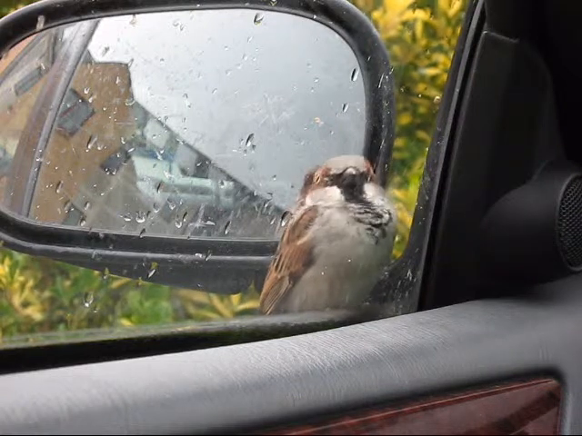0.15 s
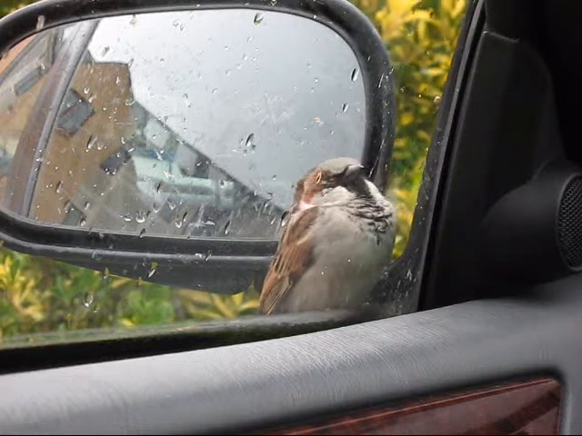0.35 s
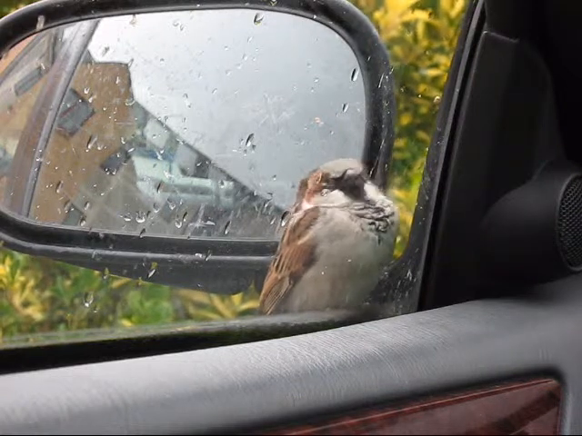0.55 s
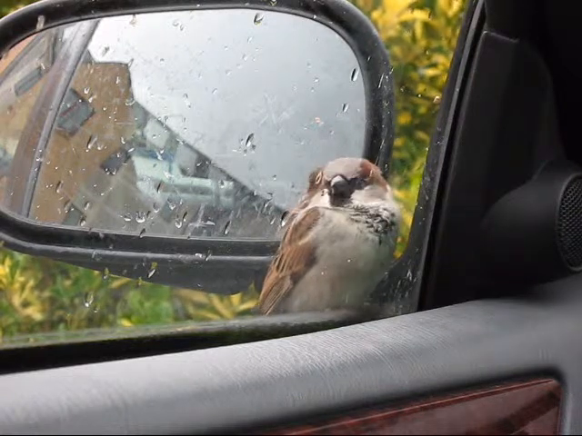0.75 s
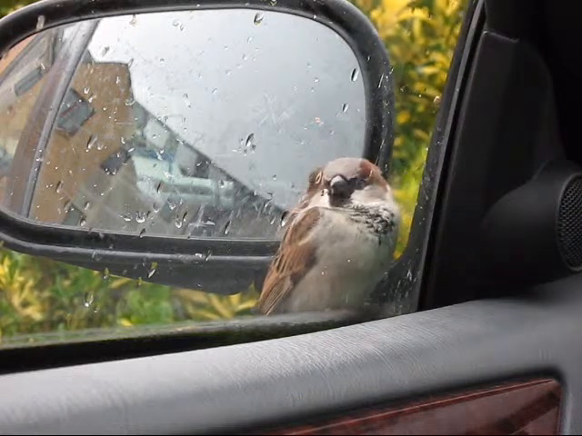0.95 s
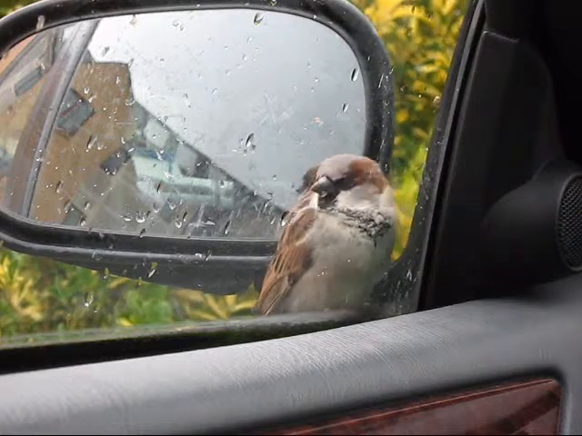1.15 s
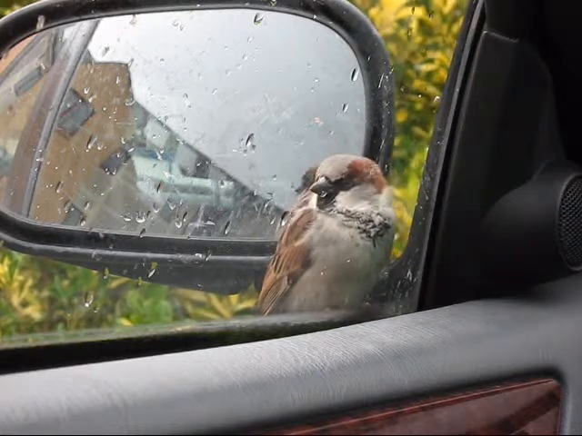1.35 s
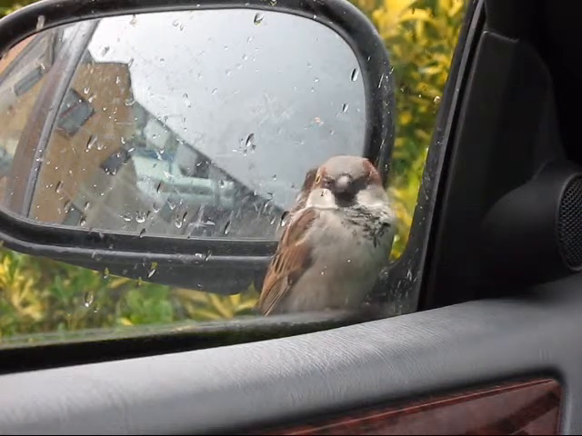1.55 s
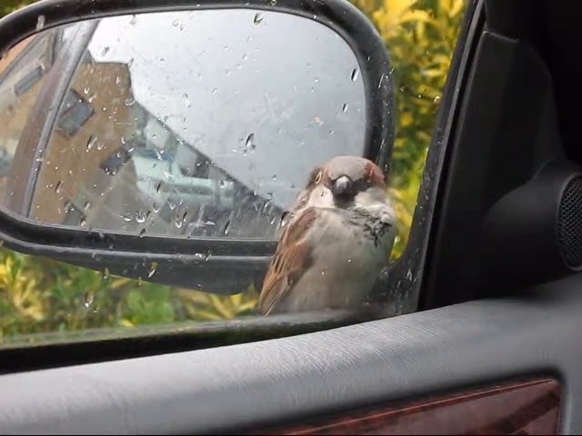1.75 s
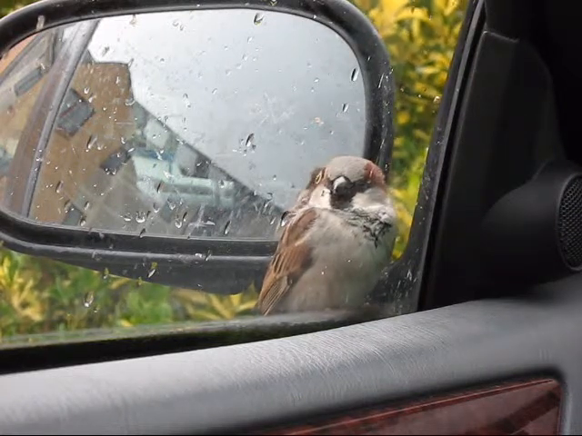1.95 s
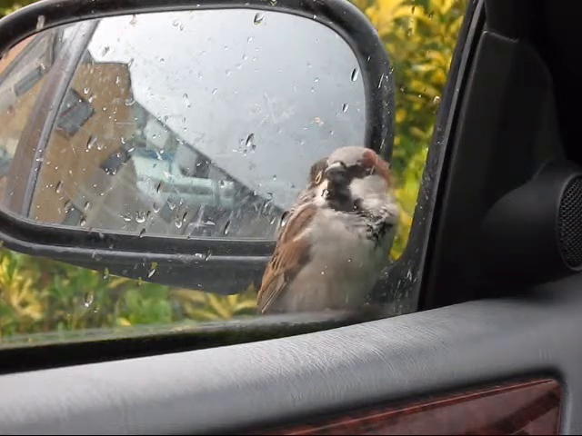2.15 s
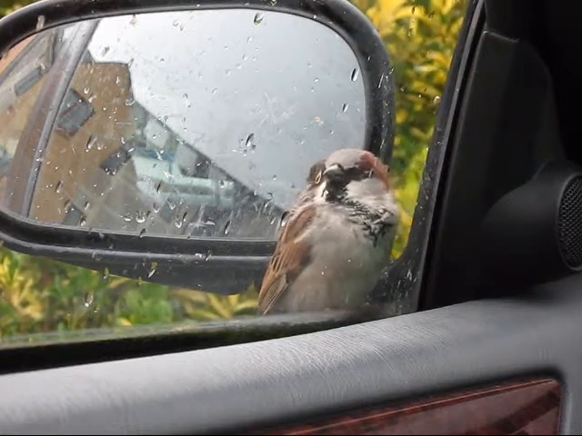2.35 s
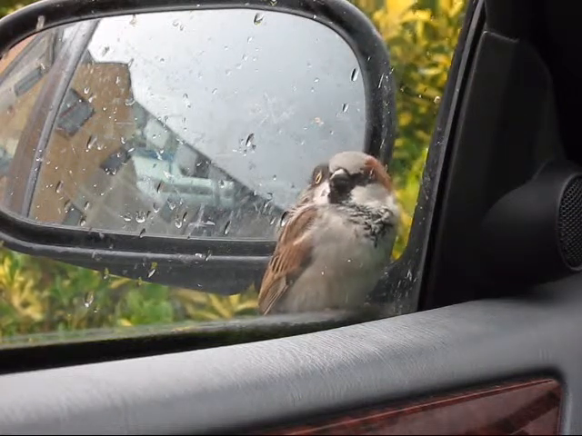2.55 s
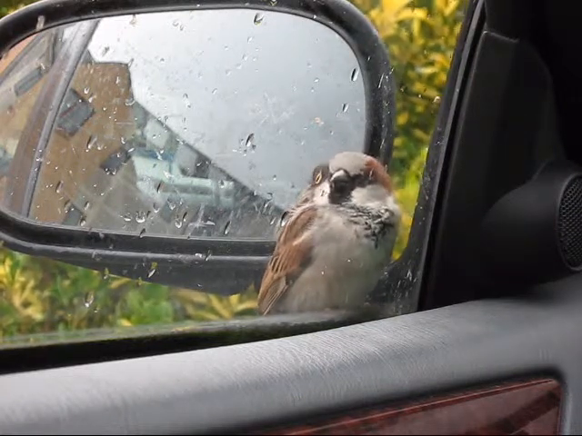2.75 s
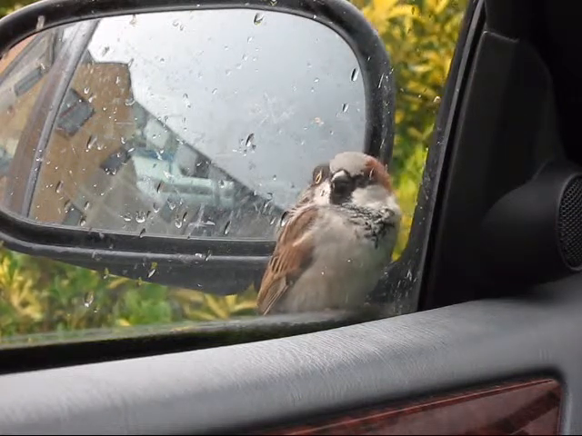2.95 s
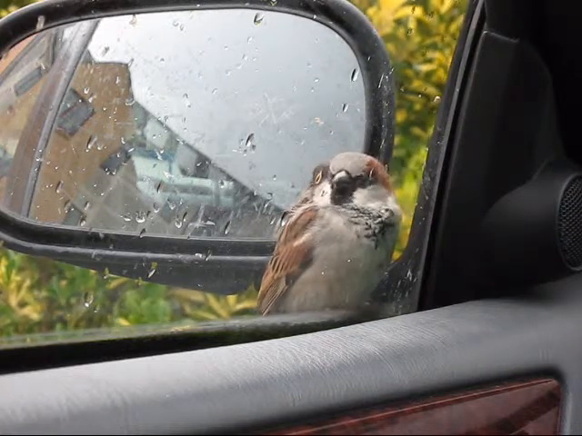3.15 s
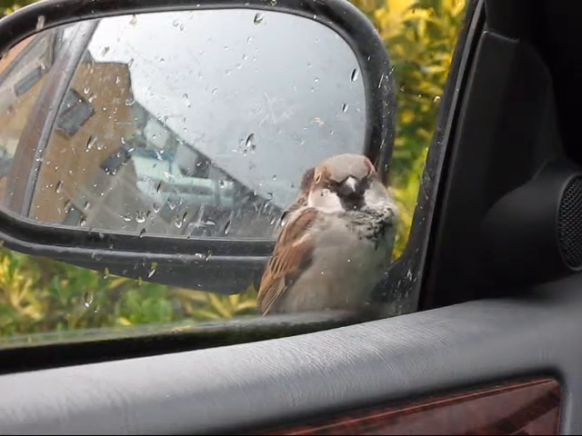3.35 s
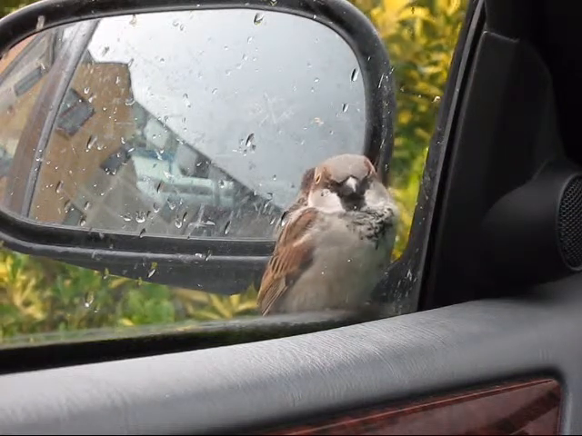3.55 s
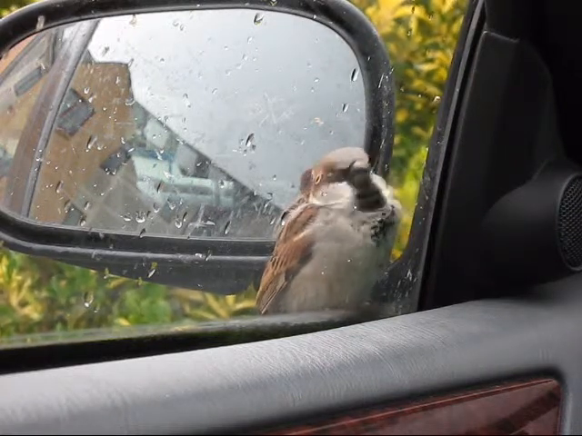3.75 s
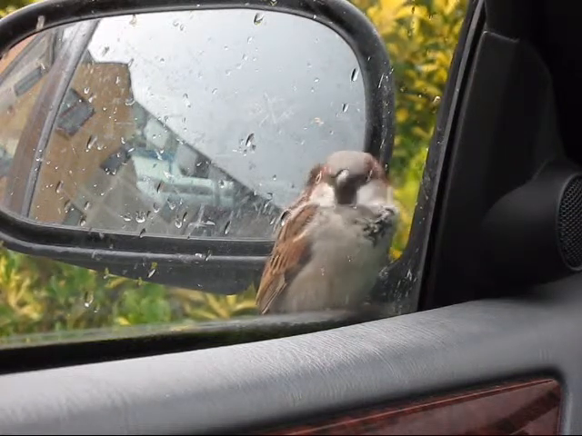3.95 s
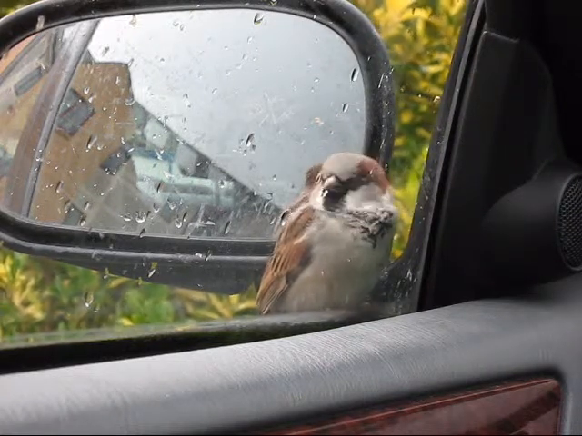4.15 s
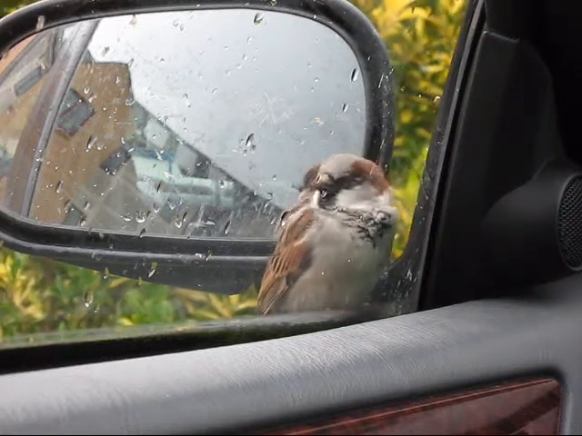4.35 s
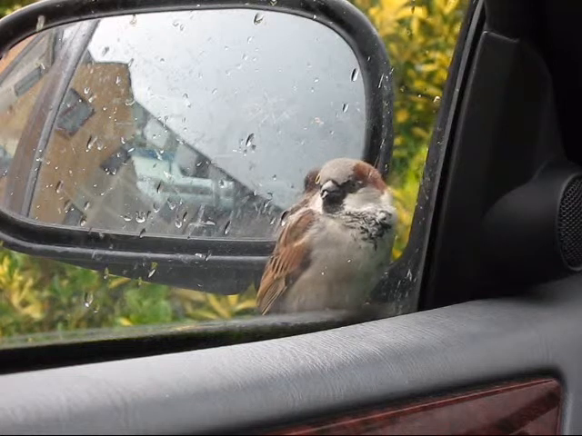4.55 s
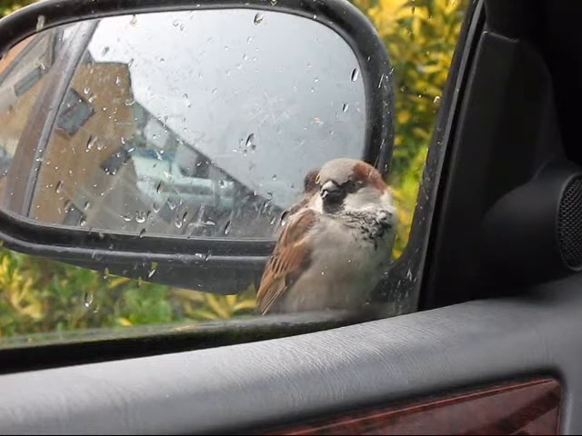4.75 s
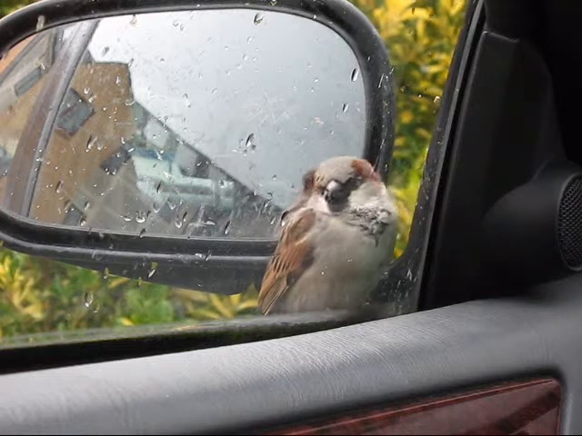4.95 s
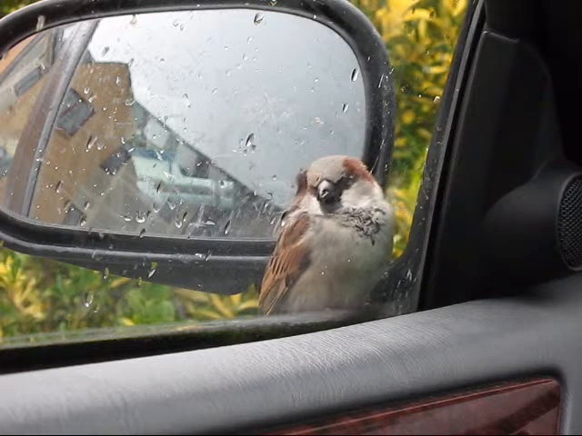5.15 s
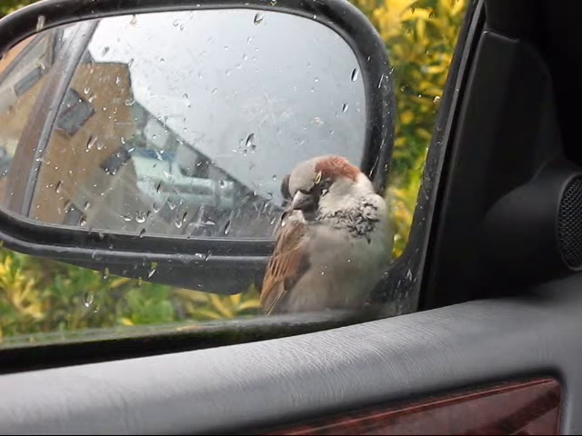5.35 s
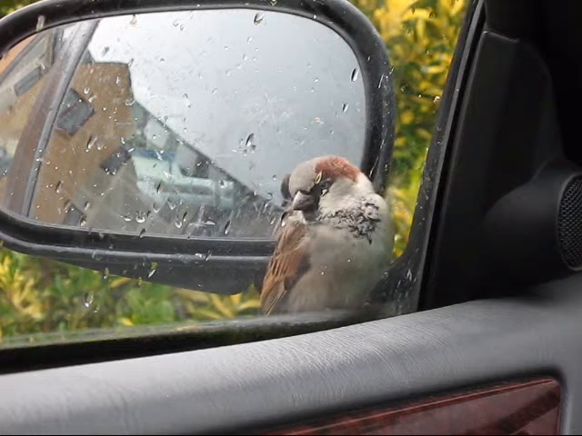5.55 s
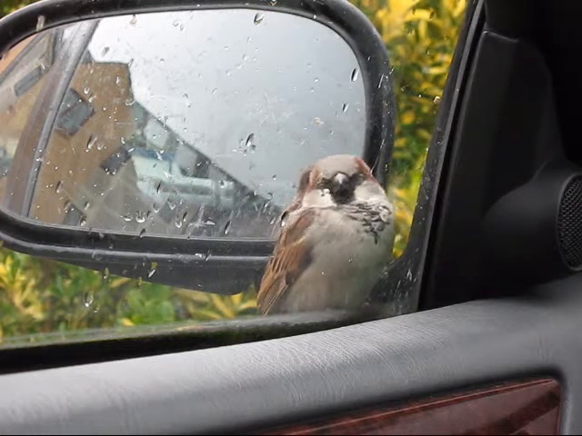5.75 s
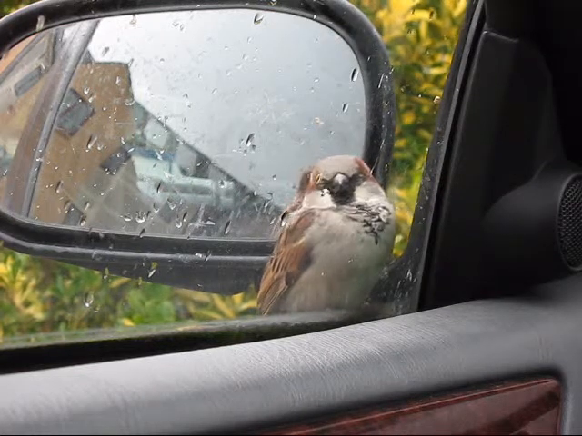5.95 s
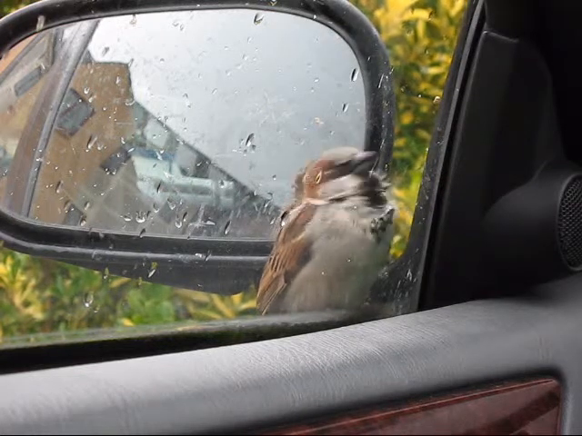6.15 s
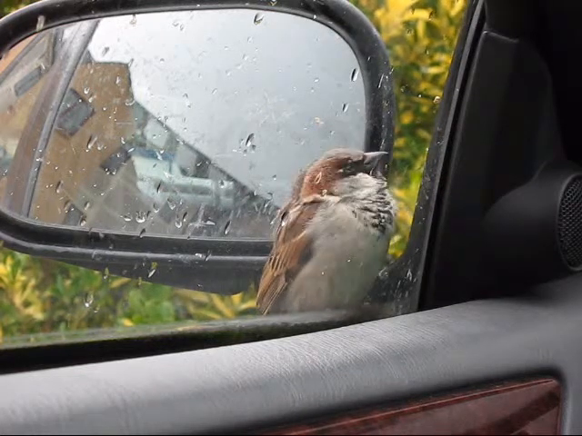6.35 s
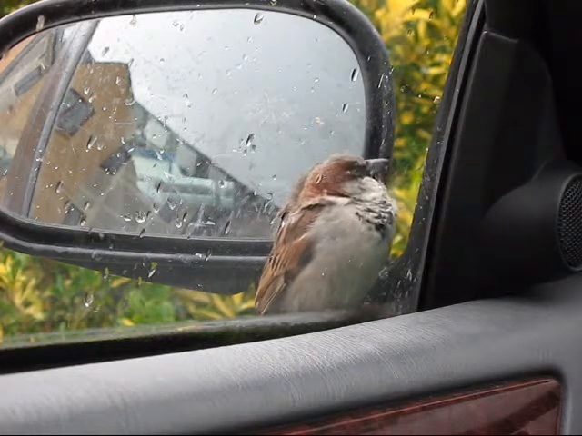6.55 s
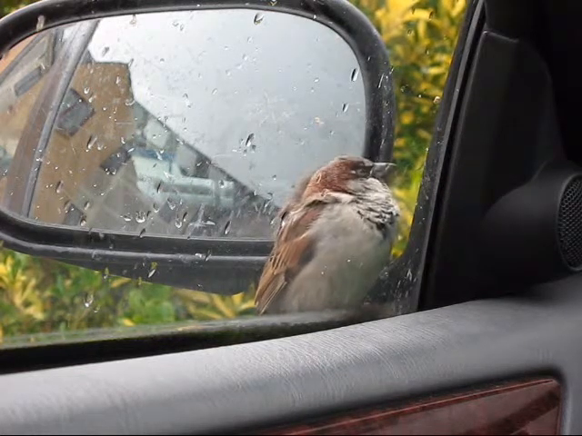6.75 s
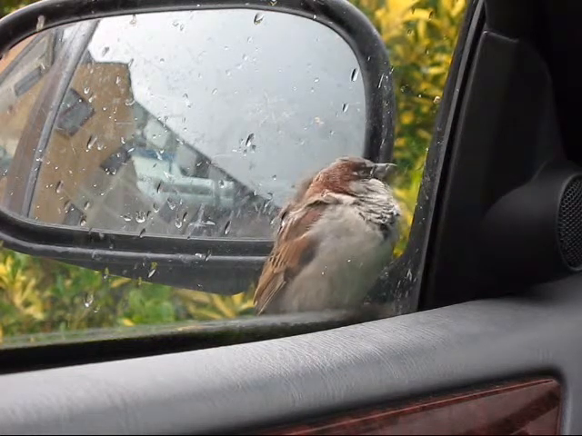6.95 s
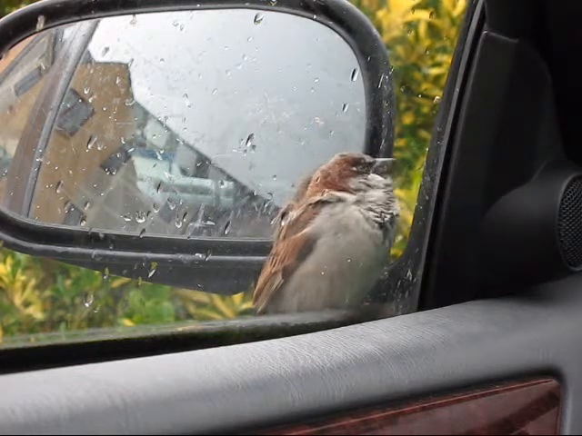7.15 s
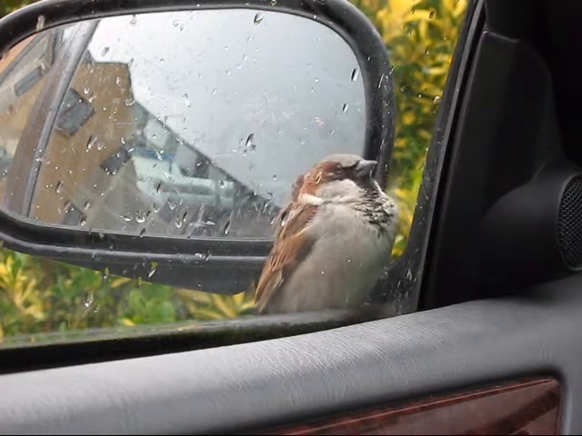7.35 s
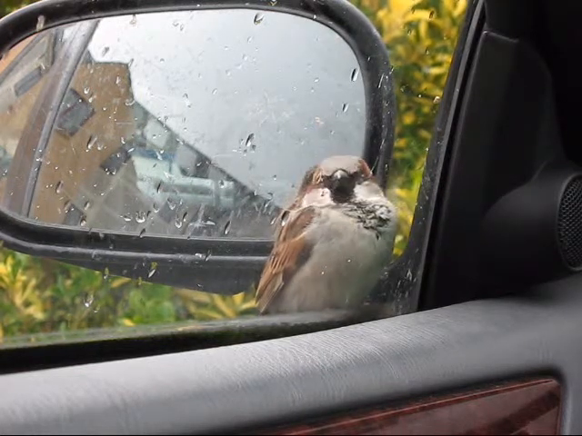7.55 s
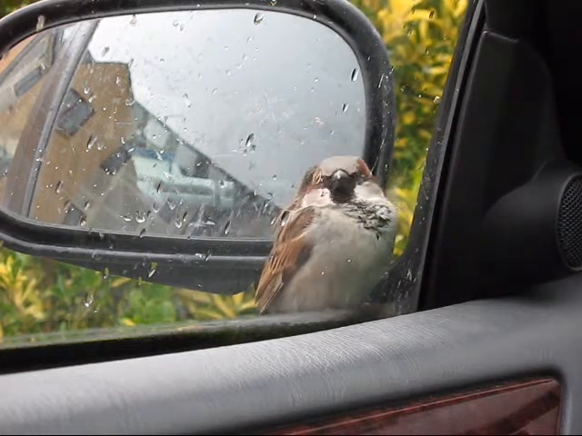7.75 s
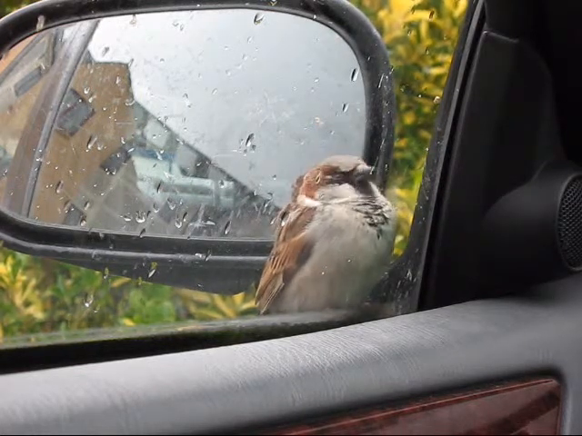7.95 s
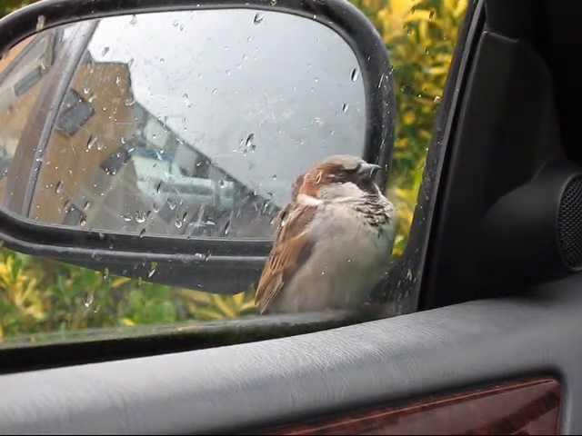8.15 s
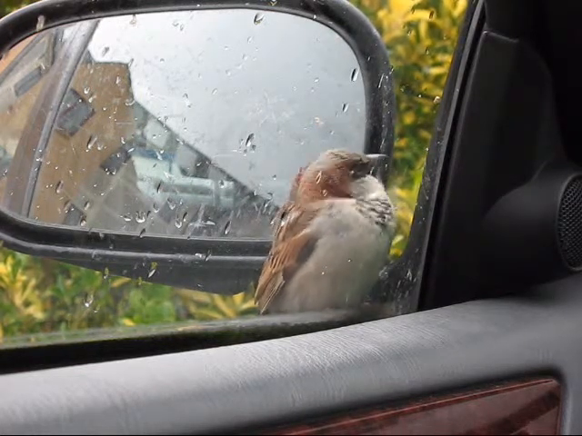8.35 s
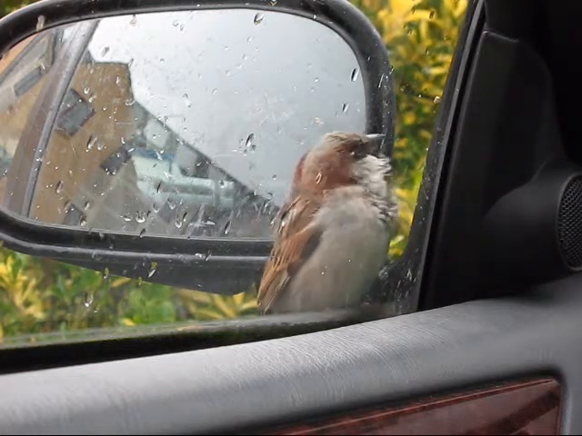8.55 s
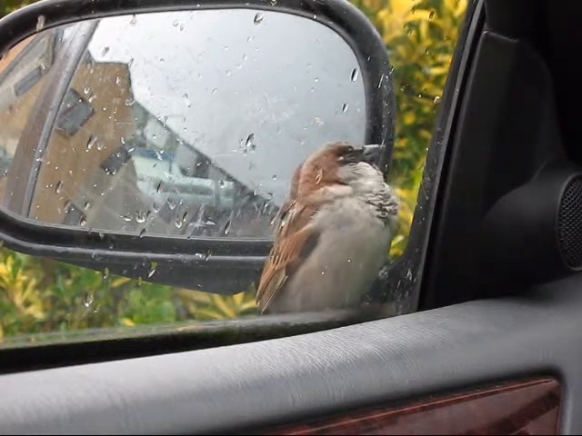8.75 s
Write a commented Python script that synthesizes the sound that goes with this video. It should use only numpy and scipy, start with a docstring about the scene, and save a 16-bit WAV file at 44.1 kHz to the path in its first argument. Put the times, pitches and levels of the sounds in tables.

```python
"""The end of a sparrow's falling whistle opens the scene, heard by a small camera inside a car.
Two soft knocks on the car body follow, then the bird, on the sill of an open window, chirps five times.
Each chirp is a rising whistle, a quick upward flick and a falling, burred whistle; moving sine pitches
and filtered hiss make them, and the cabin echoes them briefly. Throughout, the camera's drive hums and whines
over distant rumble and faint tones; its coarse converter adds hiss and mirrored treble."""
import sys
import numpy as np
from scipy import signal
from scipy.fft import rfft, irfft
from scipy.io import wavfile
from scipy.ndimage import uniform_filter1d

SR = 44100
rng = np.random.default_rng(int(sys.argv[2]) if len(sys.argv) > 2 else 0)


def transcribe(signal):
    """Save signal, clipped to [-1, 1], as a 16-bit WAV file at the path in sys.argv[1]."""
    frames = np.atleast_2d(signal).T
    limited = np.clip(frames, -1, 1)
    pcm = np.round(limited * 32767).astype(np.int16)
    wavfile.write(sys.argv[1], SR, pcm)


N = 387198  # samples in the scene
TIME = np.arange(N) / SR  # seconds

# Both whistles: how they start and stop
ATTACK_S, ATTACK_DB, ATTACK_HZ = .0035, 14, 109.75  # the start is this much softer and lower
RELEASE_S, RELEASE_DB, RELEASE_HZ = .006, 17.5, 169.5  # time and pitch drop: falling whistle only
# Rising whistle: its scoop, then the leap to the held top
SCOOP_FROM_HZ, SCOOP_SWELL_DB, SCOOP_SAG_HZ = 2150, 15.5, 39.97
LEAP_HZ, LEAP_DB, SETTLE_S, CUT_S = 3440, -31, .008, .004
# Falling whistle: its burr (throbbing) and the break in pitch
BURR_HZ, BURR_FROM_HZ, BURR_SWING_HZ = 166, 3650, 122.9
CLEAR_BURR, FULL_BURR = .07, .62  # depths, 0 to 1
TURN_S, TURN_DROP_HZ, TURN_FADE_DB = .007, 481, 3.5


def undb(db):
    """Turn decibels into a plain multiplier."""
    return 10 ** (np.asarray(db) / 20)


def walk(rate):
    """Random wandering: levels held 1 / rate seconds, then smoothed twice; spread near 1."""
    hold = int(SR / rate)
    steps = np.repeat(rng.standard_normal(N // hold + 1), hold)
    return 1.3 * uniform_filter1d(uniform_filter1d(steps, hold), hold)[:N]


def phase_of(hz):
    """Add up a moving pitch to get the phase in radians."""
    return 2 * np.pi * np.cumsum(hz) / SR


def rumble():
    """Dull noise from far off, swelling a little, over the microphone's own hiss."""
    # Noise strength at each pitch: (frequency [Hz], level [dB per Hz])
    noise_colour = [(15, -87), (40, -71), (52, -71.5), (62, -79), (95, -75), (135, -72), (200, -73),
                    (270, -79), (400, -79.5), (900, -86), (2000, -91.5), (5500, -96)]
    hz, db = np.transpose(noise_colour)
    freqs = np.maximum(np.fft.rfftfreq(N, 1 / SR), 1)
    colour = undb(np.interp(np.log(freqs), np.log(hz), db)) * np.sqrt(SR / 2)
    noise = irfft(rfft(rng.standard_normal(N)) * colour, N)
    return noise * undb(.7 * walk(.8))


def drones():
    """Faint sine tones in the rumble, wandering in pitch and level."""
    # Middle of each wandering tone: (frequency [Hz], level [dB])
    drone_tones = [(129, -62), (148, -65.5), (205, -63), (392, -70.5)]
    out = np.zeros(N)
    for hz, db in drone_tones:
        level = np.sqrt(2) * undb(db + 3.5 * walk(4))
        out += level * np.sin(phase_of(hz * (1 + .03 * walk(5))))
    return out


def thuds():
    """Soft knocks on the car body: low panel tones that ring and die away."""
    # Ringing tones: (time [s], frequency [Hz], level before fade-in [dB], time to fade 60 dB [s])
    panel_tones = [(1.462, 35.97, -31.5, 0.46), (1.466, 80.8, -38.5, 0.25), (1.50, 140.6, -40, .2),
                   (1.775, 61.5, -42.5, 0.088)]
    out = np.zeros(N)
    for start, hz, db, t60 in panel_tones:
        t = np.maximum(TIME - start, 0)
        fade_in = np.minimum(t / .008, 1)
        out -= undb(db - 60 * t / t60) * fade_in * np.sin(2 * np.pi * hz * t)
    return out


def drive():
    """The camera's drive: a wavering hum and a whine whose pitch trembles once a shaft turn."""
    hum_hz, hum_db = 73.7, -48.5
    whine_hz, whine_db = 3044.5, -56
    wobble_hz, wobble_rad = 19.75, .5
    hum = undb(hum_db + 2.2 * walk(12)) * np.sin(phase_of(hum_hz + .7 * walk(3)))
    wobble = wobble_rad * np.sin(2 * np.pi * wobble_hz * TIME)
    whine = undb(whine_db + .5 * walk(5)) * np.sin(2 * np.pi * whine_hz * TIME + wobble)
    return np.sqrt(2) * (hum + whine)


def cabin(x):
    """Sound bouncing in the car: a few clear echoes off glass and roof, then a short blurred tail."""
    # Early echoes, beside a direct sound of 0 dB: (delay [s], level [dB])
    early_echoes = [(.0023, -11), (.0041, -12), (.0067, -14)]
    t60_s, tail_db = .11, -13.5
    t = np.arange(SR // 4) / SR
    tail = rng.standard_normal(len(t)) * undb(-60 * t / t60_s) * np.minimum(t / .006, 1)
    response = tail * undb(tail_db) / np.sqrt(np.sum(tail ** 2))
    response[0] = 1  # the direct sound
    for delay, db in early_echoes:
        response[int(delay * SR)] += undb(db)
    response /= np.sqrt(np.sum(response ** 2))  # keep the overall loudness
    return signal.oaconvolve(x, response)[:N]


def air(low_hz, high_hz):
    """Hiss of air escaping through the beak: noise kept between two frequencies."""
    band = signal.butter(3, [low_hz, high_hz], "band", fs=SR, output="sos")
    return signal.sosfilt(band, rng.standard_normal(N))


def flicks():
    """A rough leap up to a top pitch and a slower drop back, all in about a hundredth of a second."""
    # (time of the top [s], top frequency [Hz], sine's peak level [dB], time scale [s])
    # the leap up takes 1/2 of the time scale, the drop back 1/1.3
    flick_tops = [(2.203, 4860, -25, 0.0099), (3.84, 4740, -26.5, 0.0096), (6.201, 4940, -23.5, .011),
                  (7.104, 4820, -26.5, 0.011), (8.531, 5244, -28, .011)]
    out, grain, puff = np.zeros(N), walk(900), air(3600, 5400)
    for top, top_hz, db, scale in flick_tops:
        u = (TIME - top) / scale * np.where(TIME < top, 2, 1.3)  # -1 start, 0 top, 1 end
        on = abs(u) < 1
        hz = top_hz * (1 - .25 * u[on] ** 2 + .027 * grain[on])
        swell = undb(db) * np.cos(np.pi * u[on] / 2) ** .7
        out[on] = swell * (np.sin(phase_of(hz)) + 1.1 * puff[on])
    return out


def spell(notes):
    """Join each note's corner points (s, Hz, dB, ..) into moving pitch, gain and any further columns."""
    # Brief dips in level: (deepest time [s], depth [dB], recovery [s], pitch kick [Hz])
    level_dips = [(2.184, 13, 0.0043, 142), (3.816, 16, .004, 150.5), (3.872, 8.5, 0.0029, 50),
                  (6.182, 7, .003, 49.5), (6.192, 15, .003, -120), (6.236, 12, 0.0032, 80.5),
                  (7.080, 8, .003, 50.5), (7.089, 14, 0.0027, 80.5), (7.099, 17, .004, 170.5),
                  (8.545, 10, .002, 50), (8.506, 9, .003, 50)]
    on = sum((TIME >= note[0][0]) & (TIME <= note[-1][0]) for note in notes)
    times, *columns = np.transpose(np.concatenate(notes))
    hz, db, *rest = (np.interp(TIME, times, column) for column in columns)
    for at, depth_db, recovery, kick_hz in level_dips:
        dip = np.interp(TIME, [at - .003, at, at + recovery], [0, 1, 0])
        hz = hz + kick_hz * dip
        db = db - depth_db * dip
    gain = np.sqrt(2) * uniform_filter1d(on * undb(db), size=40)  # silent between notes
    return hz, gain, *rest


def rise(s, scoop, scoop_hz, scoop_db, leap, held_hz, held_db, close_hz, close_db, length):
    """Corner points of a soft scoop that swells and steepens, a leap, a held top and a quick release."""
    soft_db = scoop_db - SCOOP_SWELL_DB
    middle_hz = (SCOOP_FROM_HZ + scoop_hz) / 2 - SCOOP_SAG_HZ
    return [(s, SCOOP_FROM_HZ - ATTACK_HZ, soft_db - ATTACK_DB),
            (s + ATTACK_S, SCOOP_FROM_HZ, soft_db),
            (s + scoop / 2, middle_hz, (soft_db + scoop_db) / 2),
            (s + scoop, scoop_hz, scoop_db),
            (s + scoop + leap, LEAP_HZ, LEAP_DB),
            (s + scoop + leap + SETTLE_S, held_hz, held_db),
            (s + length - CUT_S, close_hz, close_db),
            (s + length, close_hz, close_db - RELEASE_DB)]


def rising():
    """One side of the syrinx: a near sine; at low pitch its octave leads and escaping air roughens it."""
    # (start [s], scoop length [s], scoop top [Hz], scoop level [dB], leap length [s],
    #  held pitch [Hz], held level [dB], closing pitch [Hz], closing level [dB], whole length [s])
    rise_notes = [(2.134, 0.031, 2590, -43.5, .004, 3800, -20.5, 3810, -15.5, .071),
                  (3.77, .027, 2595, -42, 0.0062, 3820, -21, 3835, -22.5, .070),
                  (6.136, .030, 2633, -39.5, 0.0049, 3960, -26, 3717, -17.5, .074),
                  (7.044, .022, 2514, -41, .008, 3935, -26.5, 3807, -27.5, 0.07),
                  (8.462, .029, 2460, -41, 0.0094, 3716, -27, 4000, -27.5, .069)]
    # The octave fades as the pitch climbs: (pitch [Hz], level of the octave above it [dB])
    octave_levels = [(2350, 11.5), (2600, 7.5), (3450, -16.5), (3900, -21.5)]
    hz, gain = spell([rise(*row) for row in rise_notes])
    loose = np.clip((3400 - hz) / 900, 0, 1)  # 0 at high pitch, 1 at low pitch
    phase = phase_of(hz * (1 + (.0022 + .018 * loose) * walk(700)))
    octave = undb(np.interp(hz, *np.transpose(octave_levels)))
    flicker = undb((1.28 + 3.5 * loose) * walk(1100))
    tone = flicker * (np.sin(phase) + octave * np.sin(2 * phase))
    breath_level = undb(-4) * loose * np.hypot(1, octave) + undb(-22)
    return gain * (tone + breath_level * air(2200, 6000))


def fall(s, entry_hz, entry_db, crest, crest_hz, crest_db, full, turn, turn_db, length, last_hz, last_db):
    """Corner points: a clear climb to the crest; the burr sets in, the pitch breaks and slides away."""
    climb_hz = entry_hz + .6 * (crest_hz - entry_hz)
    climb_db = entry_db + .48 * (crest_db - entry_db)
    full_db = np.interp(full, [crest, turn], [crest_db, turn_db])
    broken_hz = crest_hz - TURN_DROP_HZ
    return [(s, entry_hz - ATTACK_HZ, entry_db - ATTACK_DB, CLEAR_BURR),
            (s + ATTACK_S, entry_hz, entry_db, CLEAR_BURR),
            (s + crest / 2, climb_hz, climb_db, CLEAR_BURR),
            (s + crest, crest_hz, crest_db, CLEAR_BURR),
            (s + full, crest_hz, full_db, FULL_BURR),
            (s + turn, crest_hz, turn_db, FULL_BURR),
            (s + turn + TURN_S, broken_hz, turn_db - TURN_FADE_DB, FULL_BURR),
            (s + (turn + length) / 2, (broken_hz + last_hz) / 2, turn_db - 2.2 * TURN_FADE_DB, FULL_BURR),
            (s + length - RELEASE_S, last_hz, last_db, FULL_BURR),
            (s + length, last_hz - RELEASE_HZ, last_db - RELEASE_DB, FULL_BURR)]


def falling():
    """The other side: as pitch drops the membrane flutters, each throb sliding from near the top pitch."""
    # (start [s], entry pitch [Hz], entry level [dB], time to crest [s], crest pitch [Hz],
    #  crest level [dB], time to full burr [s], time to turn [s], turn level [dB],
    #  whole length [s], last pitch [Hz], last level [dB]); a start below 0 is already under way
    fall_notes = [(-.054, 3100, -35, .019, 3500, -27, .028, 0.034, -30.5, .074, 2280, -49),
                  (2.209, 3074, -35.5, 0.021, 3434, -27.5, 0.023, 0.036, -27.5, .071, 2200, -48.5),
                  (3.837, 3240, -43, .019, 3543, -18, 0.032, 0.036, -28, 0.066, 2250, -45.5),
                  (6.211, 3240, -35, .018, 3570, -21.5, 0.023, .027, -28.5, 0.068, 1992, -47),
                  (7.107, 2598, -36.5, .019, 3360, -27, .026, .033, -26, .069, 2132, -44.5),
                  (8.531, 3000, -32, .016, 3420, -25.5, 0.036, 0.044, -28, 0.072, 2086, -48)]
    hz, gain, burr = spell([fall(*row) for row in fall_notes])
    burr = np.clip(burr, 0, 1)
    drop = np.clip((BURR_FROM_HZ - hz) / 700, 0, 1) * burr  # the throbbing end carries more breath
    flutter = phase_of(BURR_HZ * (1 + .22 * walk(90)))
    high = ((1 + np.cos(flutter)) / 2) ** 1.6  # 1 at the top of each throb
    swing_hz = BURR_SWING_HZ + np.maximum(BURR_FROM_HZ - hz, 0)
    leap_hz = burr * swing_hz * (high - .15)
    phase = phase_of(hz * (1 + (.0025 + .024 * burr) * walk(500)) + leap_hz)
    throb = 1 + burr * np.sin(flutter)
    flicker = undb(3.5 * drop + 3.3 * burr * walk(800))
    tone = throb * flicker * np.sin(phase)
    return gain * (tone + undb(-24 + 30 * drop) * air(2000, 4800))


def scene():
    """Add the bird, echoed by the cabin, to the sounds around it; one channel."""
    bird = cabin(rising() + falling() + flicks())
    return (bird + drive() + rumble() + drones() + thuds())[None]


def record(dry):
    """The camera: dulled, sampled at a quarter rate on 8 bits with a small offset, each value held."""
    hold, steps = 4, 128  # samples per held value; levels between 0 and full scale
    dull = signal.sosfilt(signal.butter(4, 5900, fs=SR, output="sos"), dry)
    coarse = np.round((dull[:, ::hold] - .0018) * steps) / steps  # rounding adds the hiss
    held = np.repeat(coarse, hold, axis=1)[:, :N]  # holding mirrors the treble upward
    top = signal.ellip(10, .2, 75, 15700, fs=SR, output="sos")  # cuts above 15700 Hz
    return signal.sosfilt(top, held)


dry = scene()
out = record(dry)
transcribe(out)
```